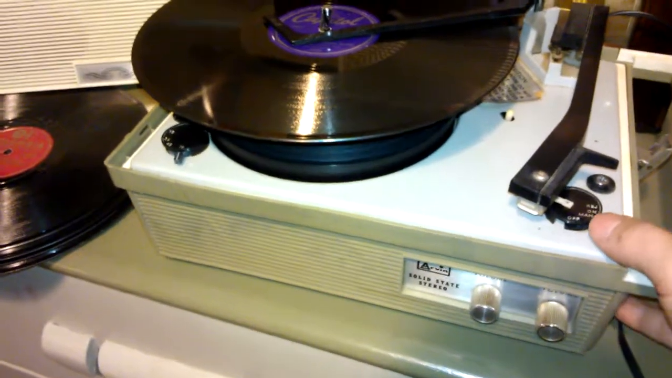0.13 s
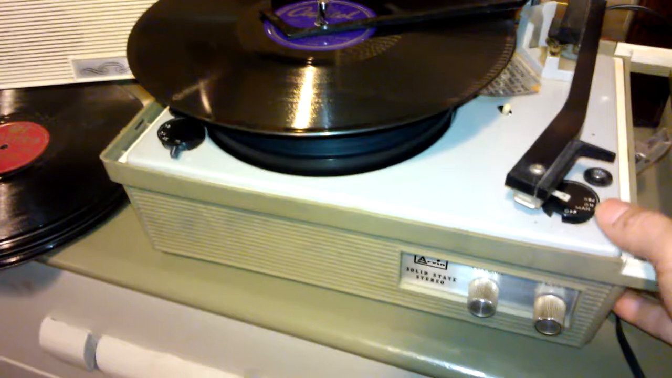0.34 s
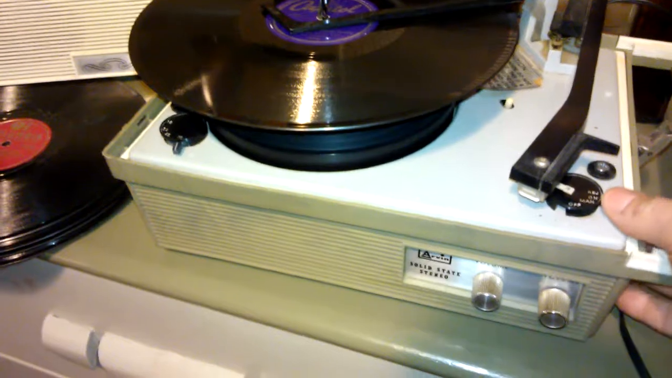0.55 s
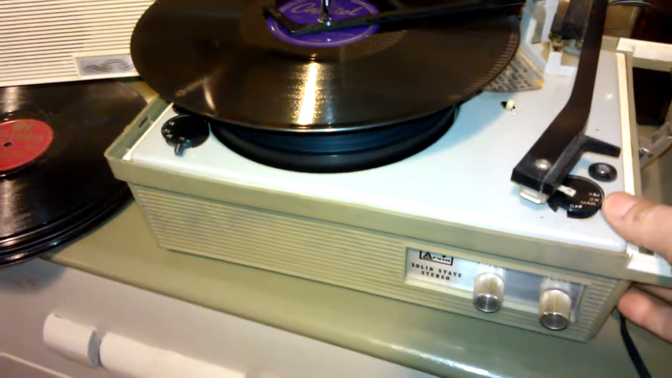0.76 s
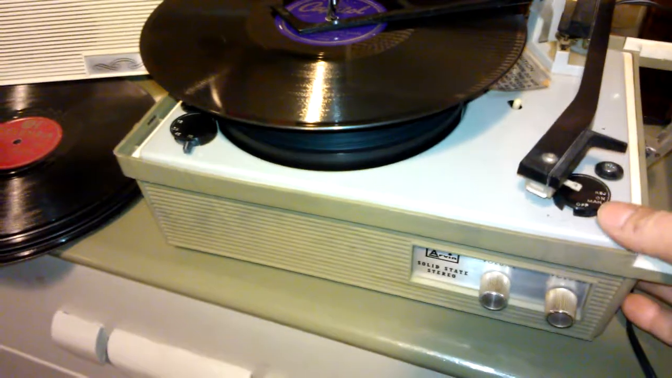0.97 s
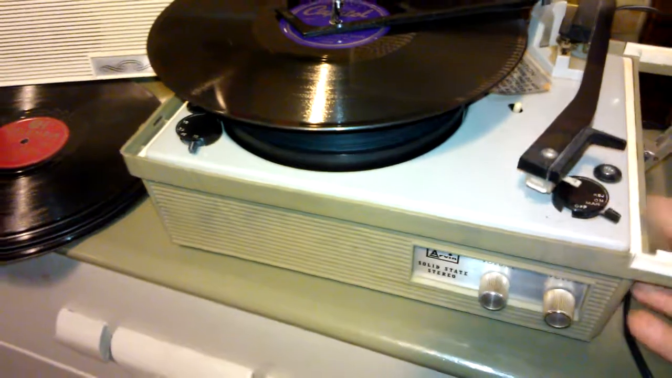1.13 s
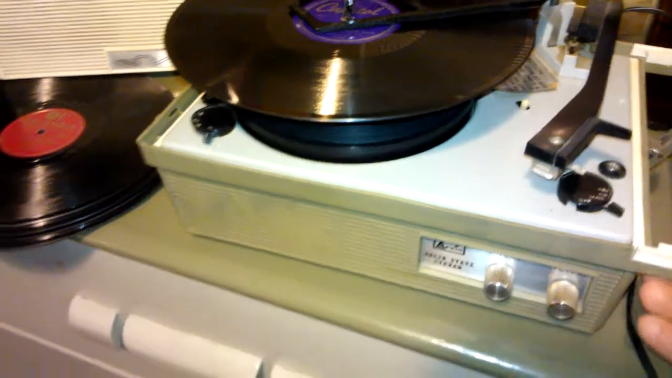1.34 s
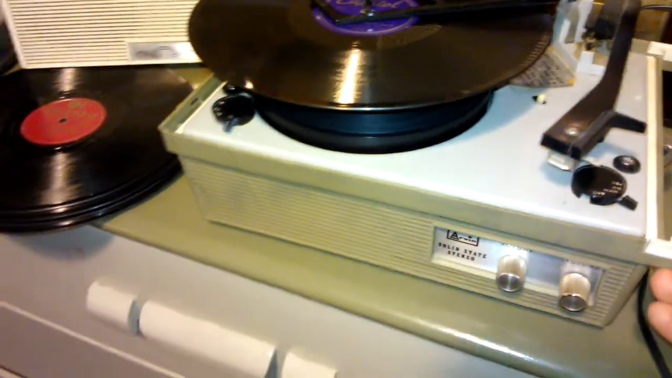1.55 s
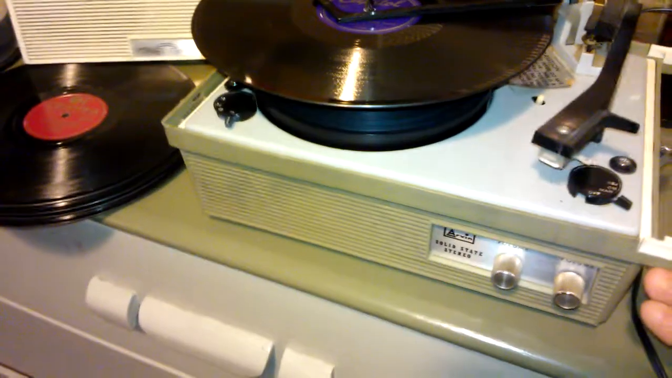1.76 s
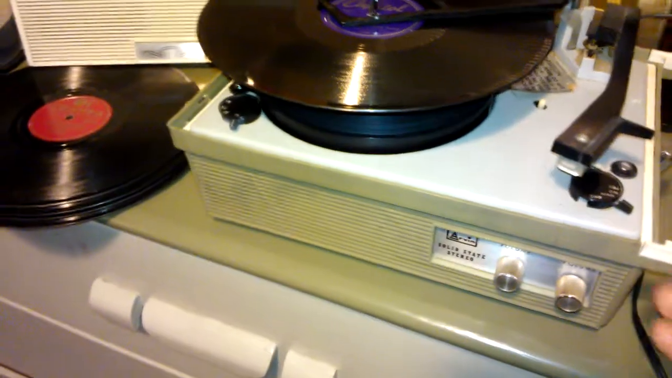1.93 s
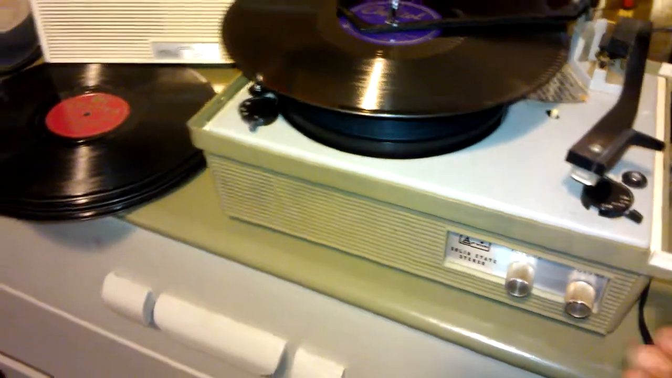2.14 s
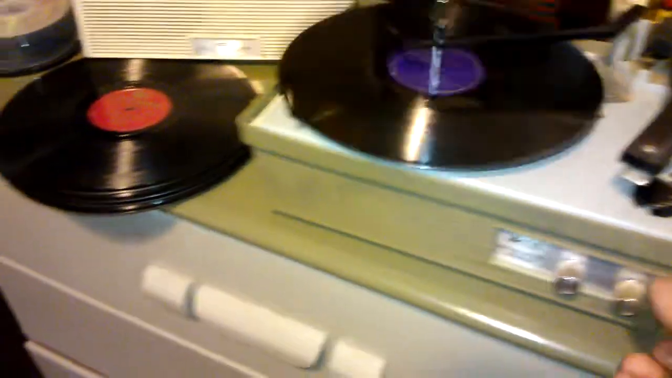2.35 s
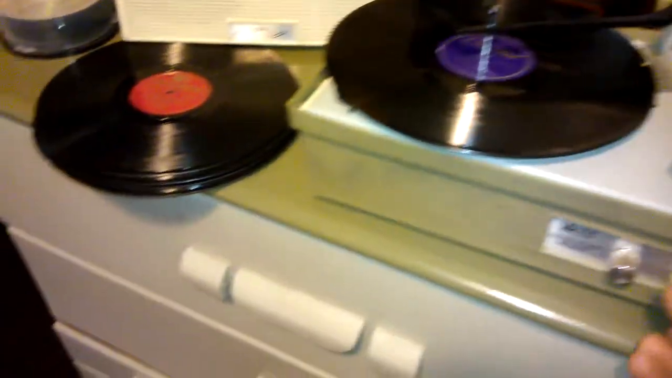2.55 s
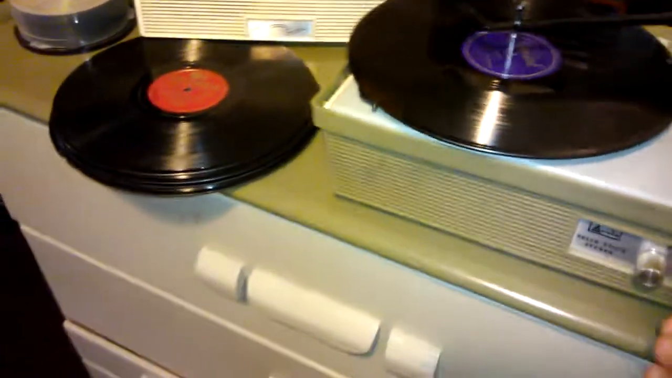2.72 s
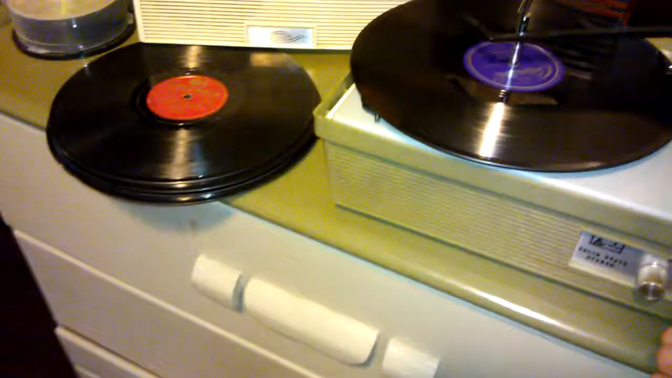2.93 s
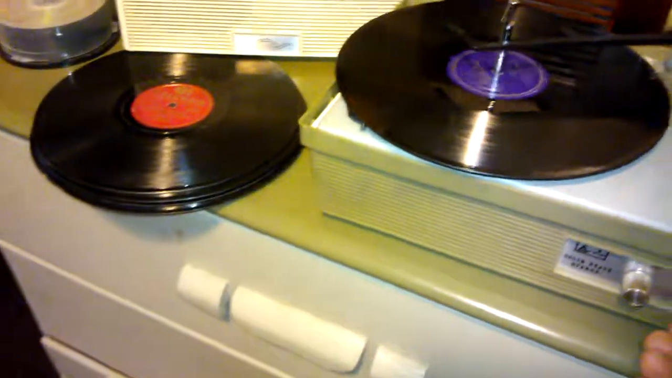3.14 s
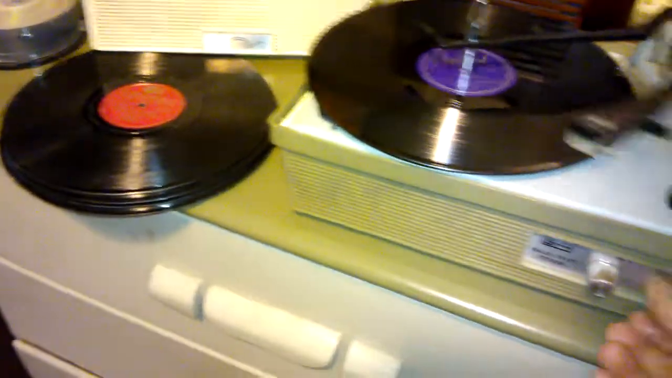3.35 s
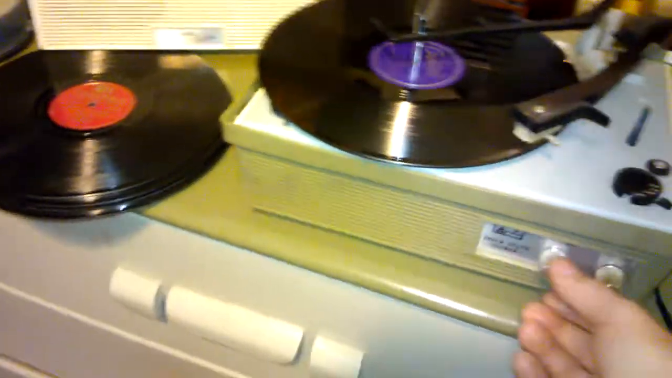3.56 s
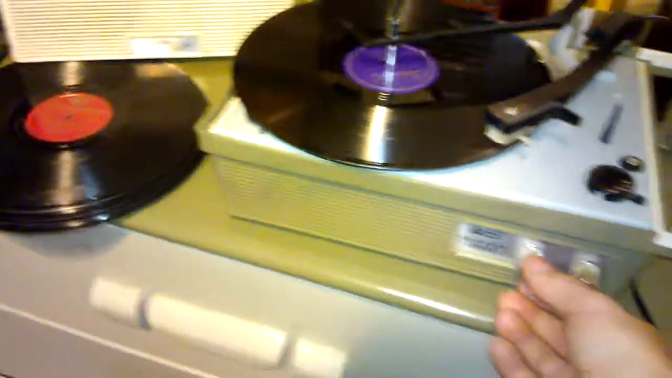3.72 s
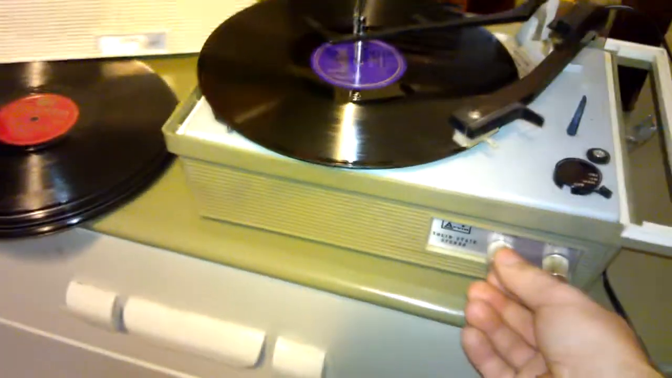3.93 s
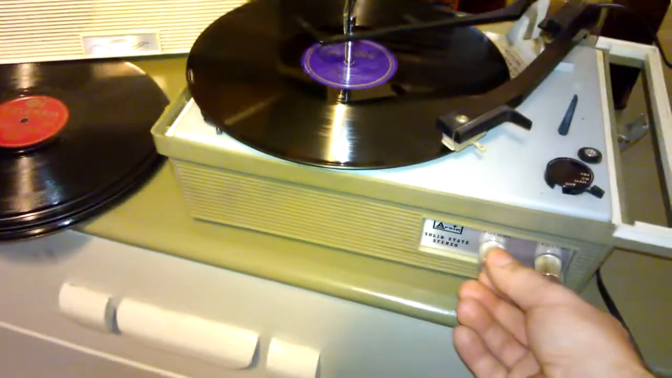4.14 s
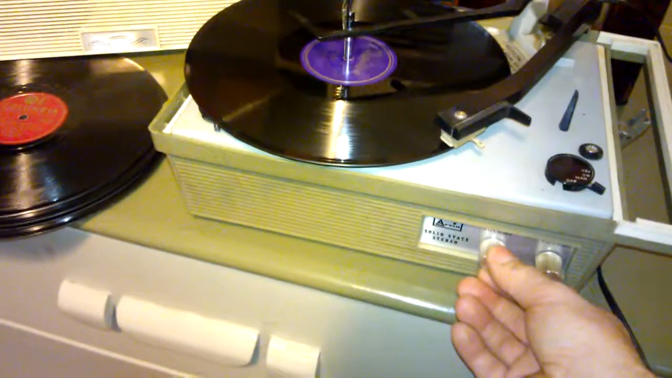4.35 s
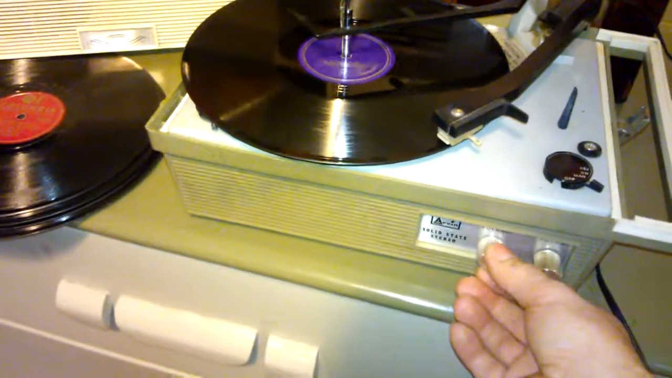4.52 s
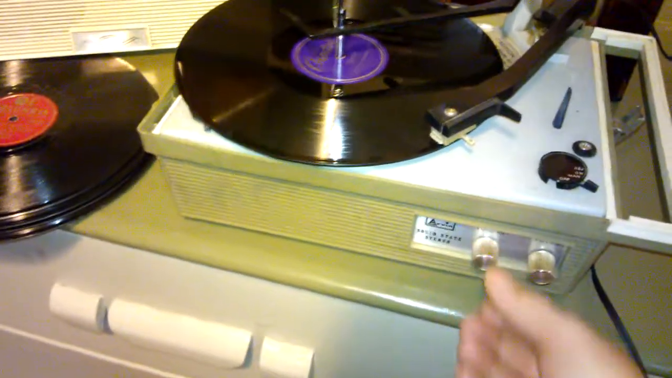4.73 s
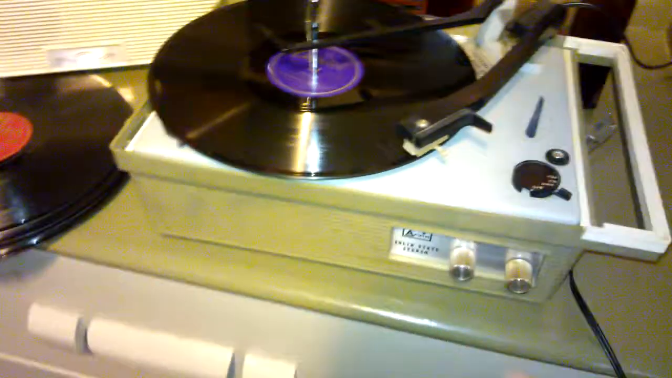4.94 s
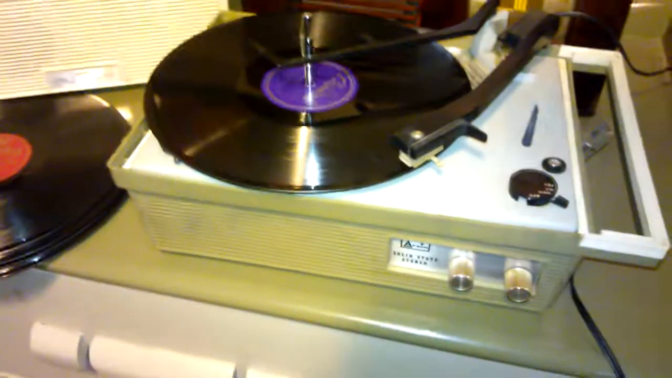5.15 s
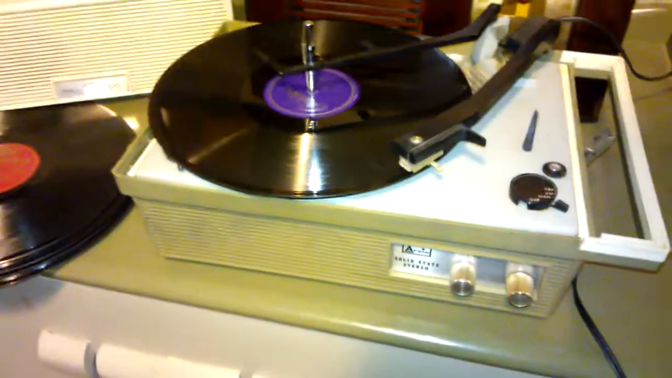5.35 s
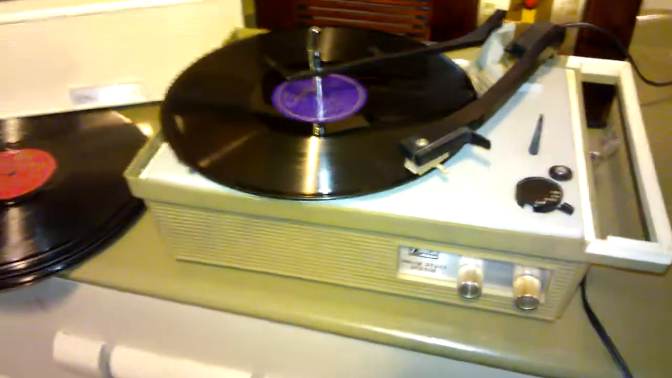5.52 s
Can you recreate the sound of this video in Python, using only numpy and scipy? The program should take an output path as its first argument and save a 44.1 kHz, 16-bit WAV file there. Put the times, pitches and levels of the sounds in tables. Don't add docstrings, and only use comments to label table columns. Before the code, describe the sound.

A portable record changer cycles: lever snap, spindle release, a disc clacking down onto the platter, then a loud ringing latch snap over low motor hum.

```python
import sys
import numpy as np
from scipy import signal
from scipy.io import wavfile

SR = 44100
rng = np.random.default_rng(int(sys.argv[2]) if len(sys.argv) > 2 else 0)


def wrap_up_sound(samples):
    columns = np.atleast_2d(samples).T
    tamed = np.clip(columns, -1, 1)
    steps = np.round(tamed * 32767).astype(np.int16)
    wavfile.write(sys.argv[1], SR, steps)


def attenuation_scalar(level_db):
    decades = np.asarray(level_db, float) / 20
    return 10 ** decades


N = 246254
TIME_S = np.arange(N) / SR

# (pitch [Hz], width [Hz], boost [dB])
DECK_MODES = [(153.2, 3.6, 14.5), (216.6, 23, -25), (375, 29, 8.5), (1054, 130, 7.5), (2650, 1100, -1.5),
              (3300, 88, 9), (3740, 41, 2.5), (7530, 150, 9), (8700, 1030, 7), (10540, 1450, 4.5)]
# (time [s], clack [dB], thud [dB], tick [dB], length [ms])
TRIP_BLOWS = [
    (4.4035, -29.5, -44, -22.5, 6.2),
    (4.4143, -11, -29, -17, 2.6),
    (4.4178, -4, -37, -1, 3.9),
    (4.4245, -10, -25.5, -18, 2),
    (4.440, -11, -29, -34.5, 8.2),
]


def rms_one(x):
    return x / np.sqrt(np.mean(x ** 2) + 1e-20)


def ramp(start_s, length_s):
    return np.clip((TIME_S - start_s) / length_s, 0, 1)


def drift(rate):
    r = np.exp(-80 * np.pi * rate / SR)
    slow = signal.lfilter([1], [1, -2 * r, r * r], rng.standard_normal(N // 40 + 2002))[2000:]
    return np.interp(np.arange(N) / 40, np.arange(len(slow)), rms_one(slow))


def catches(per_s, depth, hold_s):
    sizes = attenuation_scalar(2.5 * np.minimum(rng.exponential(1, N), 3))
    snags = sizes * (rng.random(N) < per_s / SR)
    return 1 + depth * signal.lfilter([1], [1, -np.exp(-1 / (hold_s * SR))], snags)


def at_hz(points, hz):
    points_hz, values = np.transpose(points)
    return np.interp(np.log(hz), np.log(points_hz), values)


def band(x, low_hz, high_hz):
    return signal.sosfilt(signal.butter(2, [low_hz, high_hz], "band", fs=SR, output="sos"), x)


def resonate(x, hz, wide):
    r = np.exp(-np.pi * wide / SR)
    top = np.array([1, 0, -1]) * (1 - r * r) / 2
    return signal.lfilter(top, [1, -2 * r * np.cos(2 * np.pi * hz / SR), r * r], x + 1e-18)


def ring(x, hz, t60):
    r, w = attenuation_scalar(-60 / (t60 * SR)), 2 * np.pi * hz / SR
    return signal.lfilter([0, np.sin(w)], [1, -2 * r * np.cos(w), r * r], x + 1e-18)


def noise_band_at(hz, wide):
    low_pass = signal.butter(2, wide / 2, fs=SR, output="sos")
    a, b = signal.sosfilt(low_pass, rng.standard_normal((2, N)))
    phase = 2 * np.pi * np.cumsum(hz) / SR
    return rms_one(a * np.cos(phase) + b * np.sin(phase))


def coloured_noise(spectrum, patchy_db):
    first, last = spectrum[0][0], spectrum[-1][0]
    edges = np.geomspace(first, last, round(3 * np.log2(last / first)) + 1)
    together = drift(5.7)
    white = rng.standard_normal((2, N))
    out = 0
    for k, (low, high) in enumerate(zip(edges, edges[1:])):
        flicker_db = patchy_db * (0.14 * together + drift(7.8))
        gain_db = at_hz(spectrum, np.sqrt(low * high)) + flicker_db
        out = out + attenuation_scalar(gain_db) * band(white[k % 2], low, high)
    return rms_one(out)


def blows(events, modes, knock_db, pitched=False, clack_hz=3250):
    # (lowest [Hz], highest [Hz])
    contact_ranges = [(150, 520), (650, 1800), (6200, 14800)]
    t = np.arange(round(.08 * SR)) / SR
    chatter = rng.standard_normal((len(events), 4, len(t)))
    crack = np.zeros(N)
    for (s, clack_db, thud_db, tick_db, last), noise in zip(events, chatter):
        if pitched:
            ms, hz, spread = 4.4, last, 1.5
        else:
            ms, hz, spread = np.clip(last, .5, 25), clack_hz, 1.58
        ranges = [*contact_ranges, (hz / spread, hz * spread)]
        rise = np.minimum(t / (.00015 * ms), 1)
        bursts = noise * rise * np.exp(-t / (.001 * ms))
        levels = attenuation_scalar(np.array([thud_db, (thud_db + clack_db) / 2 + knock_db, tick_db, clack_db]))
        at = round(s * SR)
        for burst, level, (low, high) in zip(bursts, levels, ranges):
            part = band(band(burst, low / 1.3, high * 1.3), low, high)
            crack[at:at + len(t)] += level * part / np.abs(part).max()
    return crack + sum(attenuation_scalar(db) * resonate(crack, hz, wide) for hz, wide, db in modes)


def disc_drop():
    # (time [s], clack [dB], thud [dB], tick [dB], length [ms])
    landings = [
        (2.352, -47.5, -31.5, -43, 32),
        (2.3795, -19.5, -30.5, -14, 2.3),
        (2.386, -37.5, -32, -28.5, 5.0),
        (2.399, -24, -27, -25, 4),
        (2.4382, -6, -23, 1, 3.4),
        (2.4445, -12, -20.5, -8, 2.3),
        (2.456, -18.5, -14, -46, 3.1),
        (2.472, -24.5, -29.5, -30.5, 16),
    ]
    # (pitch [Hz], width [Hz], boost [dB])
    disc_modes = [(157.7, 27, 2.8), (269.5, 27, 5.9), (356.4, 18, 8.2), (417.5, 15, 1.8), (890, 57, 8.2),
                  (2400, 350, 5.7), (2520, 180, 6.7), (3184, 120, 15), (4120, 62, 1.1), (4580, 23, 1)]
    return blows(landings, disc_modes, knock_db=0.5)


def case_bounce():
    # (pitch [Hz], level [dB], time to fade 60 dB [s])
    wobbles = [(28.4, -20, 0.57), (73.5, -16.5, 0.31), (38, -23.5, .3), (55, -23, 0.69),
               (126.3, -30.5, 0.45)]
    push = np.zeros(N)
    push[round(2.443 * SR)] = 1
    return sum(attenuation_scalar(db) * ring(push, hz, t60) for hz, db, t60 in wobbles)


def trip_latch():
    # (pitch [Hz], width [Hz], boost [dB])
    latch_modes = [(373, 62, 3.9), (1055, 65, 12.5), (1410, 680, 6), (2790, 260, 5.8), (4580, 300, 1.3),
                   (6680, 470, 8.7)]
    return blows(TRIP_BLOWS, latch_modes, knock_db=-5.5)


def latch_spring(shake):
    # (pitch [Hz], width [Hz], boost [dB])
    spring_modes = [(2690, 14, 9), (2733, 7, 18), (2782, 11, 12), (2838, 11, 10), (3207, 14, 9),
                    (4384, 14, 8), (4685, 10, 10), (4710, 14, 7), (4900, 14, 7), (6300, 18, 6)]
    # (pitch [Hz], width [Hz], level [dB], time to fade 60 dB [s])
    coils = [(2750, 150, -18, .33), (4690, 110, -28, .36)]
    t = TIME_S - TRIP_BLOWS[0][0]
    since = np.maximum(t, 0)
    drive = shake * (t > 0) * np.exp(-since / .16)
    rings = sum(attenuation_scalar(db - 5) * resonate(drive, hz, wide / 1.3) for hz, wide, db in spring_modes)
    buzz = 0
    for hz, wide, db, t60 in coils:
        buzz = buzz + attenuation_scalar(db - 60 * since / t60) * noise_band_at(np.full(N, hz), wide)
    struck = ramp(TRIP_BLOWS[2][0], .004)
    return attenuation_scalar(4 * drift(45)) * rings + struck * buzz


def spindle_latch():
    # (time [s], clack [dB], thud [dB], tick [dB], length [ms])
    releases = [
        (2.203, -25.5, -35, -31.5, 22.5),
        (2.2065, -18, -57.5, -11, 6.5),
        (2.2095, -12.5, -44, -4, 4.3),
    ]
    # (pitch [Hz], width [Hz], boost [dB])
    spindle_modes = [(1010, 160, 9.3), (2840, 180, 9.3), (3570, 180, 14), (4320, 170, 3.7),
                     (7040, 320, 6.4), (8000, 330, 2.6), (13950, 570, 3.9)]
    return blows(releases, spindle_modes, knock_db=3.0)


def lever_snap():
    # (time [s], clack [dB], thud [dB], tick [dB], length [ms])
    snaps = [
        (0.5837, -20, -34, -20.5, 2.5),
    ]
    # (pitch [Hz], width [Hz], boost [dB])
    lever_modes = [(1120, 260, 5.5), (2590, 280, 9), (4180, 280, 3.5)]
    return blows(snaps, lever_modes, knock_db=0.0, clack_hz=2670)


def sharp_clicks():
    # (time [s], clack [dB], thud [dB], tick [dB], clack pitch [Hz])
    contacts = [(0.3561, -49.5, -51, -56, 2820), (0.415, -46, -52.5, -42, 3440),
                (0.4612, -35.5, -64, -31, 3150), (0.499, -32.5, -60, -37, 3170),
                (1.0023, -20.5, -42, -26, 4040), (1.5756, -42, -44, -61, 2400),
                (1.6486, -39.5, -71, -52.5, 3270), (1.9094, -47.5, -75, -49.5, 3300),
                (1.942, -33, -44.5, -40, 3200), (3.1897, -52, -43, -52, 3020),
                (3.2094, -41.5, -47.5, -55, 3370), (3.3522, -40.5, -59, -38, 3470),
                (3.462, -32, -45.5, -37, 3300), (3.917, -43, -85, -46, 4500),
                (3.9492, -41.5, -77, -40.5, 3400), (4.0474, -24.5, -54, -21.5, 3140),
                (4.1246, -42, -37.5, -48, 3020), (4.1664, -43.5, -33.5, -58, 2280),
                (4.2233, -40, -67, -35, 3030), (4.3212, -49, -44, -49, 2650)]
    return blows(contacts, DECK_MODES, knock_db=-1.0, pitched=True)


def dull_knocks():
    # (time [s], clack [dB], thud [dB], length [ms])
    knocks = [(0.2074, -46, -51.5, 6.8), (0.541, -36.5, -45.5, 3.6), (0.7173, -39, -35.5, 7.3),
              (0.75, -42, -57, 9.4), (0.7659, -47, -31.5, 8.6), (0.7931, -49, -41, 4.2),
              (0.8092, -36, -62, 10), (0.8352, -60, -43, 5.9), (0.873, -37, -61, 3.9),
              (1.3498, -49, -73, 17), (1.719, -49, -61, 13), (2.0384, -41.5, -50.5, 7.3),
              (2.734, -47, -46, 7.2), (2.7616, -45.5, -54, 5.3), (2.829, -57, -58, 6.8),
              (2.9737, -46.5, -58, 5.7), (2.999, -48.5, -60, 3.8), (3.5185, -37, -37.5, 8.6),
              (3.8037, -35.5, -33.5, 5.9), (3.8193, -57, -32, 2.8), (4.0789, -54, -42, 32),
              (4.188, -52, -45, 9.3), (4.7506, -51, -57, 9.1), (4.8473, -45.5, -51, 7.1),
              (5.0162, -51, -54, 5.7), (5.1785, -51.5, -54.5, 34), (5.289, -43, -57, 5.1),
              (4.036, -73, -40.5, 6), (4.066, -72, -38, 5.2), (0.552, -66, -41.5, 5.4)]
    events = [(s, clack_db, thud_db, clack_db - 8.5, ms) for s, clack_db, thud_db, ms in knocks]
    return blows(events, DECK_MODES, knock_db=0.5)


def escaping_air():
    # (time [s], length [s], from [Hz], to [Hz], level [dB])
    air_puffs = [
        (2.565, .23, 1000, 1136, -54.5),
        (2.802, 0.18, 1410, 1710, -61),
        (2.96, .34, 1203, 2200, -60.5),
        (3.127, 0.063, 1520, 1525, -58.5),
        (3.31, 0.27, 1480, 2085, -57.5),
        (2.699, .15, 2430, 2750, -54),
        (2.938, 0.058, 2750, 3000, -54),
        (3.151, 0.043, 3010, 3030, -57),
        (3.306, 0.039, 2980, 3300, -57),
    ]
    puffs = 0
    for s, length, from_hz, to_hz, db in air_puffs:
        hz = from_hz + (to_hz - from_hz) * ramp(s, length) ** .75
        swell = ramp(s, .045) * (1 - ramp(s + length, .045))
        puffs = puffs + attenuation_scalar(db) * swell * noise_band_at(hz, .13 * from_hz)
    low_hz, high_hz = 2060 * (1 + .05 * drift(6.0)), 3130 * (1 + .03 * drift(6.0))
    low = attenuation_scalar(-64 + 3.5 * drift(10.0)) * noise_band_at(low_hz, wide=160.0)
    high = attenuation_scalar(-67.5 + 3 * drift(11.0)) * noise_band_at(high_hz, wide=350.0)
    return attenuation_scalar(1.5 * drift(14)) * puffs + ramp(4.3, .1) * (low + high)


def needle():
    # (pitch [Hz], width [Hz], level [dB])
    pickup_modes = [(6760, 280, -4), (7420, 150, -8), (8450, 500, 5), (9600, 290, -0.5), (10600, 250, 0.5),
                    (11500, 300, -1), (12400, 300, -3)]
    down_s = 4.04
    level_db = -58 - 2 * (TIME_S - down_s)
    white = catches(per_s=11.0, depth=0.67, hold_s=0.0081) * rng.standard_normal(N)
    peaks = 0
    for hz, wide, db in pickup_modes:
        peaks = peaks + attenuation_scalar(db) * rms_one(band(white, hz - wide / 2, hz + wide / 2))
    return ramp(down_s, 0.033) * attenuation_scalar(level_db + 1.2 * drift(16.0)) * rms_one(peaks)


def deck_boom():
    # (time [s], level [dB])
    cam_leans = [(0.54, -51), (0.7, -48), (0.82, -33), (1.41, -53), (1.8, -44), (1.99, -49), (2.1, -67),
                 (2.23, -43), (2.49, -32), (3.56, -46), (3.84, -60), (4.11, -44), (4.49, -55), (4.7, -44.5),
                 (5.16, -52)]
    swells = 0
    for s, db in cam_leans:
        rise_db, fall_db = 198 * (TIME_S - s), 145 * (s - TIME_S)
        swells = swells + attenuation_scalar(db + np.minimum(rise_db, fall_db))
    hz = 156 * (1 + 0.014 * drift(6.1))
    tone = np.sin(2 * np.pi * np.cumsum(hz) / SR)
    return (attenuation_scalar(-56.5) + swells) * attenuation_scalar(-7.0 + 1.7 * drift(13.0)) * tone


def cam_load():
    # (time [s], load [dB])
    load_curve = [(0.0, 2.5), (0.5, 3), (1.1, 4.5), (1.4, 3.5), (1.7, 4), (2.0, 2.5), (2.2, 9.5),
                  (2.55, 13), (2.72, 0.5), (3.3, 5.5), (3.6, 3), (4.1, 8), (4.6, 5), (5.0, 0.5), (5.3, 4.5),
                  (5.58, 2)]
    s, db = np.transpose(load_curve)
    return np.interp(TIME_S, s, db)


def gear_rub(load_db):
    # (pitch [Hz], level [dB])
    rub_spectrum = [(450, -19), (650, -6), (900, 2), (1200, -3.5), (1600, 1.5), (2100, -3), (2700, -7.5),
                    (3400, -4.5), (4500, -11.5), (6000, -12.5), (8000, -48)]
    # (pitch [Hz], width [Hz], boost [dB])
    sheet_modes = [(860, 4.3, 2), (1480, 14, 0), (2200, 21, 0.5), (2600, 34, 9.5), (3300, 110, -4),
                   (3960, 43, -8), (4530, 80, 1.5), (7420, 150, 10)]
    rub = catches(per_s=65.0, depth=0.081, hold_s=0.004) * coloured_noise(rub_spectrum, patchy_db=3.5)
    metal = sum(attenuation_scalar(db) * resonate(rub, hz, wide) for hz, wide, db in sheet_modes)
    return attenuation_scalar(-59 + 0.79 * load_db) * rms_one(rub + metal)


def idler_rumble(load_db):
    # (pitch [Hz], level [dB])
    rumble_spectrum = [(80, -9), (110, -32), (160, 1.5), (240, -6.5), (350, 0.5), (440, -5), (560, -16.5),
                       (720, -26)]
    return attenuation_scalar(-63.5 + 1.3 * load_db) * coloured_noise(rumble_spectrum, patchy_db=0.85)


def motor(load_db):
    # (pitch [Hz], level [dB])
    hum_lines = [(59.2, -48), (118.4, -64), (156.1, -73.5), (236.9, -63.5), (349.9, -63.5)]
    base_hz, base_db = hum_lines[0]
    turns = base_hz * TIME_S + .04 * drift(5.6)
    hum = 0
    for hz, db in hum_lines:
        phase = 2 * np.pi * (hz / base_hz * turns + rng.random())
        hum = hum + attenuation_scalar(db - base_db + 0.77 * drift(8.5)) * np.sin(phase)
    return attenuation_scalar(-48 - .3 * load_db) * np.sqrt(2) * hum


def hand_shake(load_db):
    # (pitch [Hz], level [dB])
    hand_spectrum = [(20, 6.5), (30, -11.5), (45, -1.5), (70, -7.5), (110, -20.5)]
    return attenuation_scalar(-54.5 + 0.55 * load_db) * coloured_noise(hand_spectrum, patchy_db=2.8)


def hiss(load_db):
    # (pitch [Hz], level [dB])
    hiss_spectrum = [(3500, -31), (5000, -20), (7000, -4), (9000, -4.5), (12000, -6.5), (14500, -3.5),
                     (16400, -12)]
    return attenuation_scalar(-64 + 0.1 * load_db) * coloured_noise(hiss_spectrum, patchy_db=.4)


def room(x):
    # (pitch [Hz], time to fade 60 dB [s])
    fade_times = [(100, 0.27), (400, 0.31), (1500, 0.29), (4000, 0.31), (8000, 0.28), (11000, 0.18),
                  (15000, 0.05)]
    edges = np.geomspace(90, 16300, 36)
    white, tail = rng.standard_normal((2, N)), 0
    for k, (low, high) in enumerate(zip(edges, edges[1:])):
        left = attenuation_scalar(-120 / (SR * at_hz(fade_times, np.sqrt(low * high))))
        stored = signal.lfilter([1 - left], [1, -left], band(x, low, high) ** 2 + 1e-18)
        dense = rms_one(band(white[k % 2], low, high))
        tail = tail + np.sqrt(stored) * attenuation_scalar(2.5 * drift(25.0)) * dense
    first_echo_s = .004
    return np.pad(tail, (round(first_echo_s * SR), 0))[:N]


def scene():
    load_db = cam_load()
    clicks, snap = sharp_clicks(), lever_snap()
    hits = dull_knocks() + spindle_latch() + disc_drop() + trip_latch()
    into_room = hits + attenuation_scalar(-0.5) * clicks + attenuation_scalar(-2.5) * snap
    hits = hits + clicks + snap + attenuation_scalar(-4.5) * room(into_room)
    steady = motor(load_db) + idler_rumble(load_db) + gear_rub(load_db)
    steady = steady + hand_shake(load_db) + deck_boom() + hiss(load_db)
    mix = hits + latch_spring(hits) + case_bounce() + steady + needle() + escaping_air()
    return mix[None]


def top_cut(x):
    return signal.sosfilt(signal.butter(12, 16640, fs=SR, output="sos"), x)


def record(dry):
    dull = signal.sosfilt(signal.butter(1, 14600, fs=SR, output="sos"), dry)
    edge = signal.cheby1(6, 1, 16000, fs=SR, output="sos")
    mix = np.clip(signal.sosfilt(edge, np.clip(dull, -1, 1)), -1, 1)
    return top_cut(mix)


dry = scene()
out = record(dry)
wrap_up_sound(out)
```